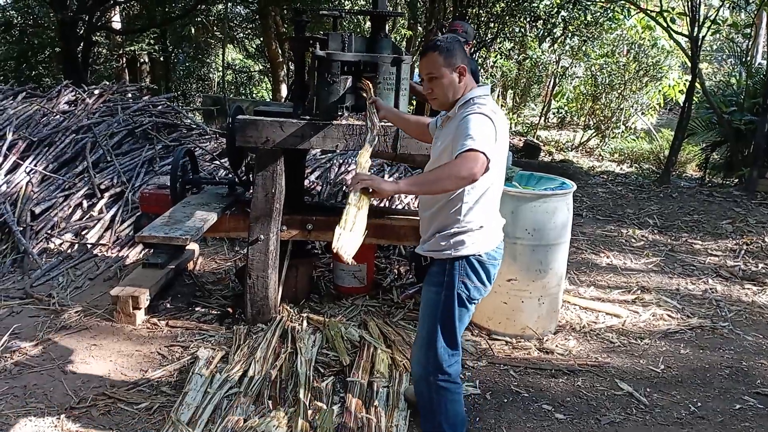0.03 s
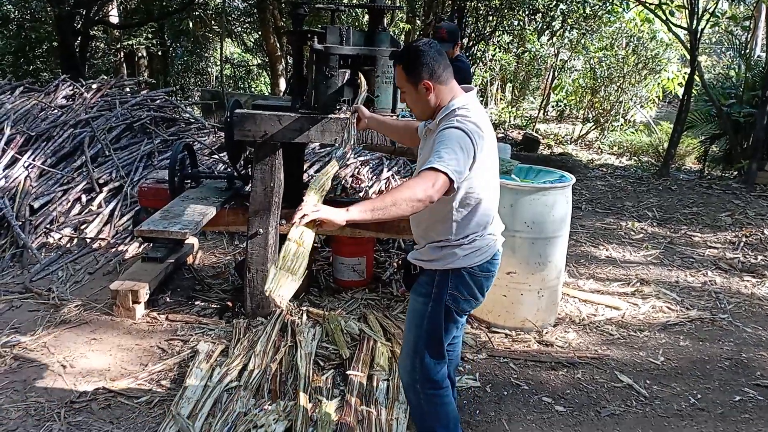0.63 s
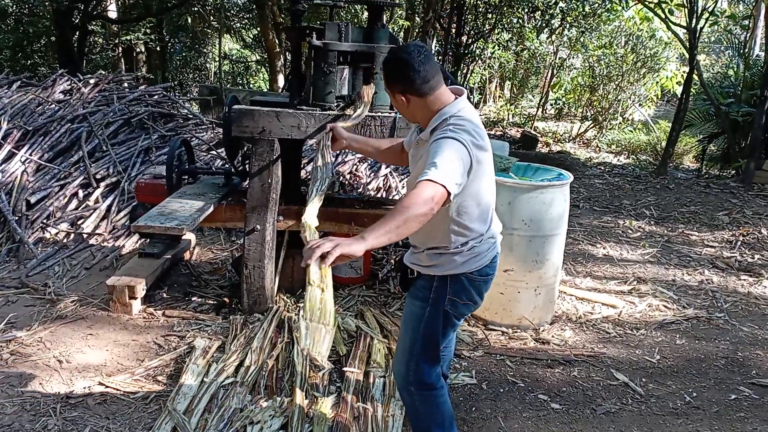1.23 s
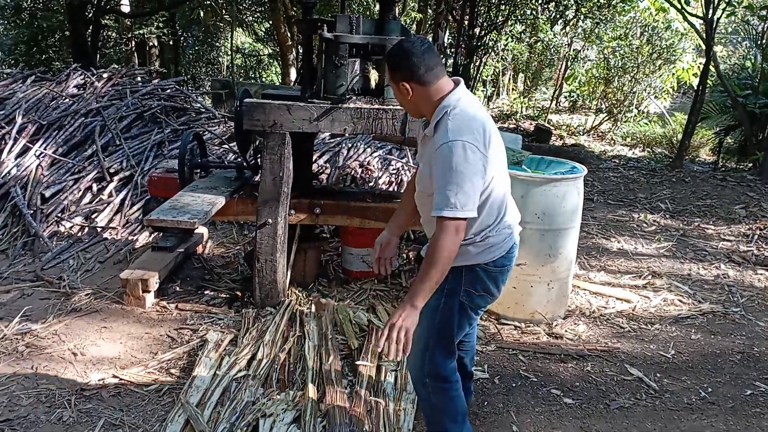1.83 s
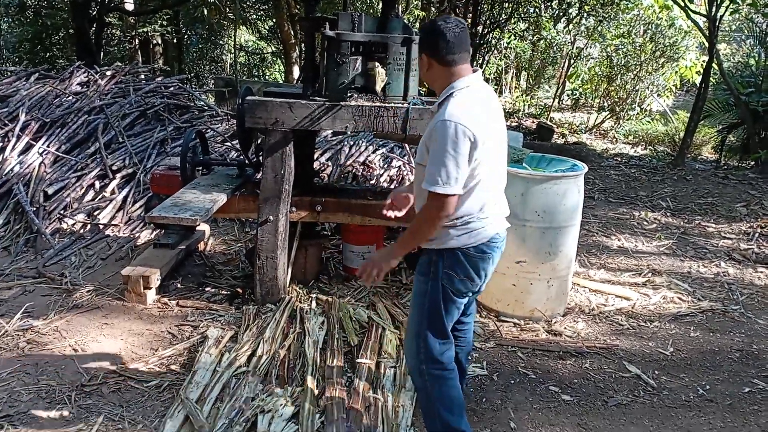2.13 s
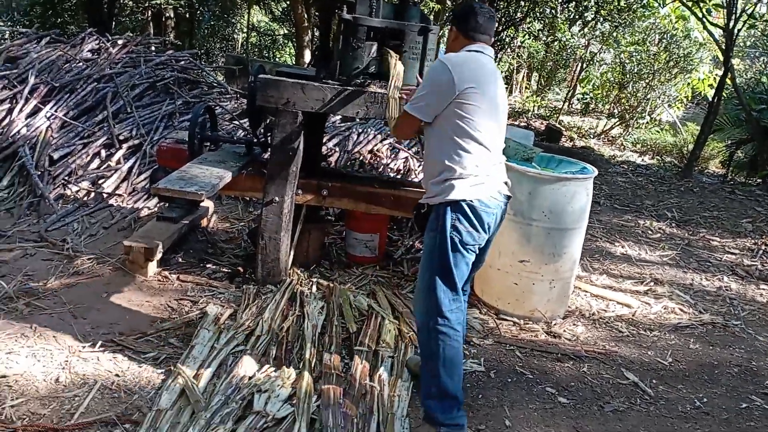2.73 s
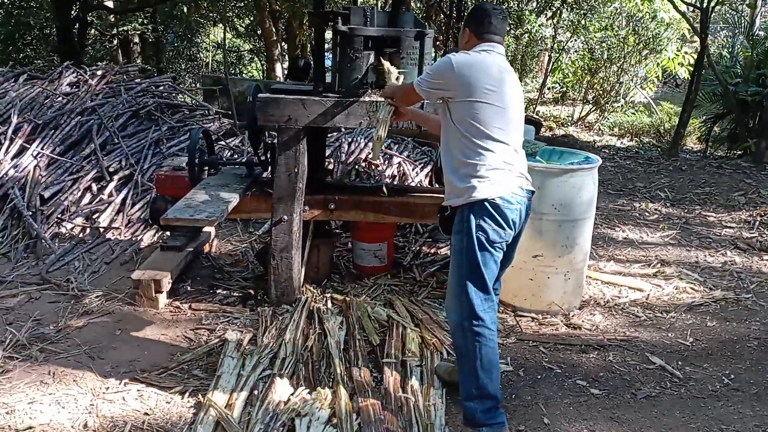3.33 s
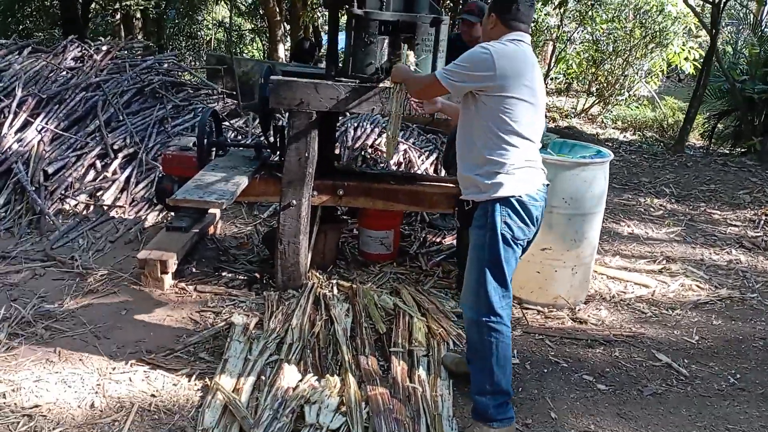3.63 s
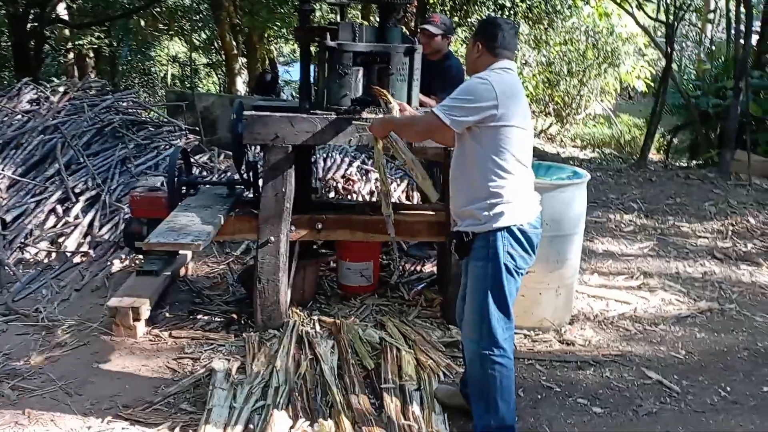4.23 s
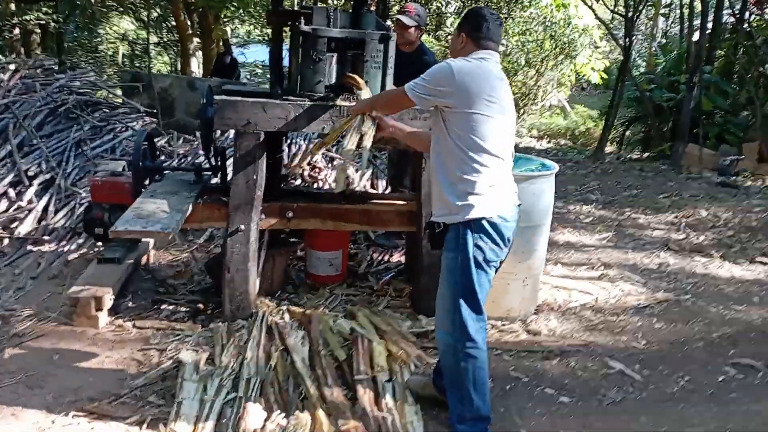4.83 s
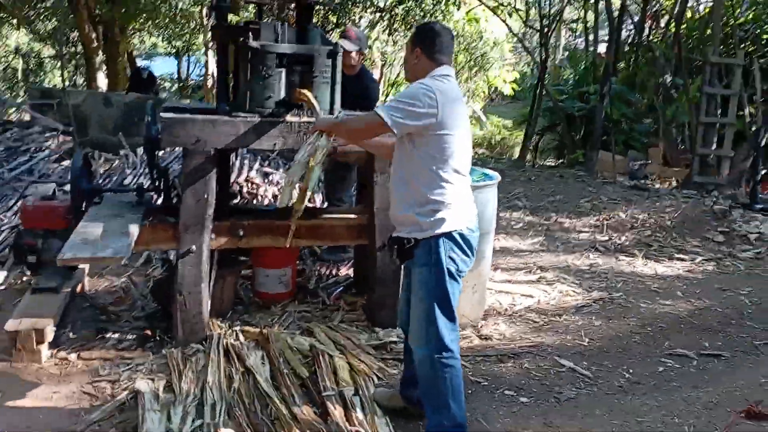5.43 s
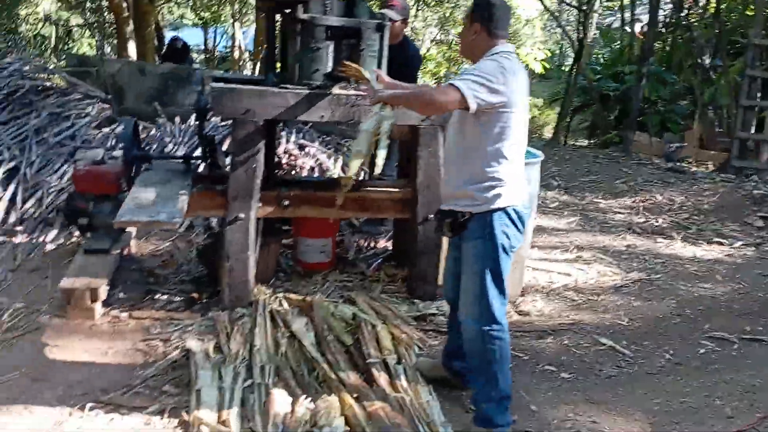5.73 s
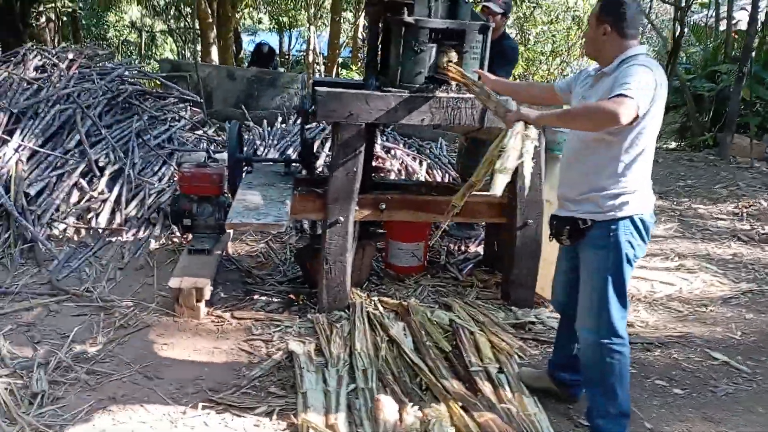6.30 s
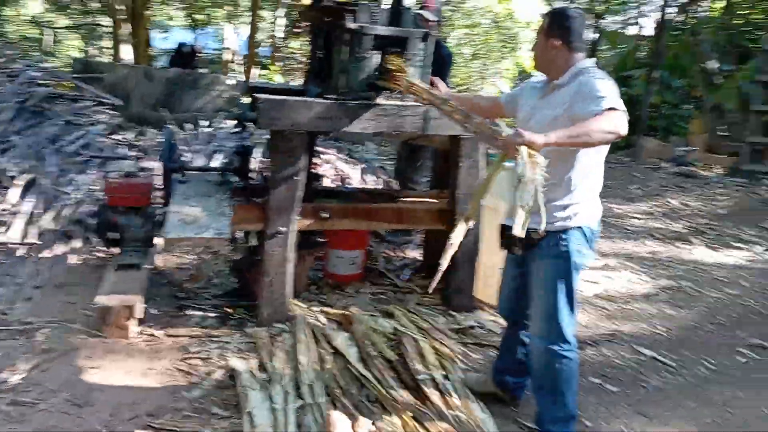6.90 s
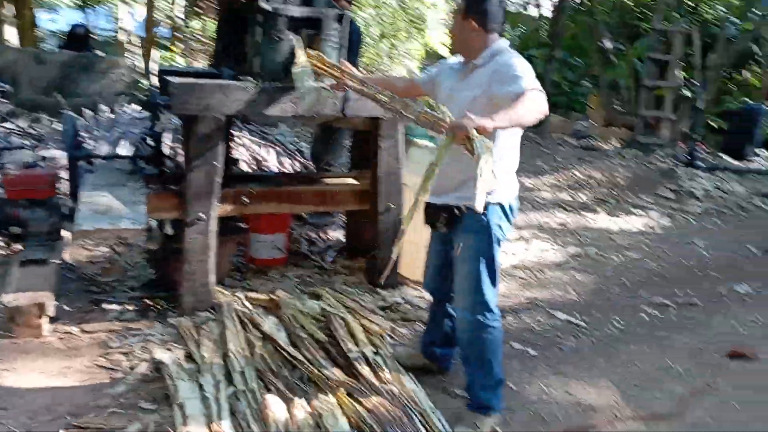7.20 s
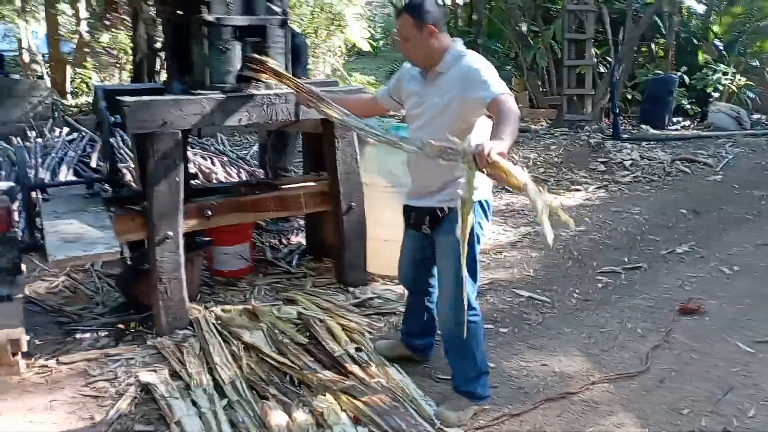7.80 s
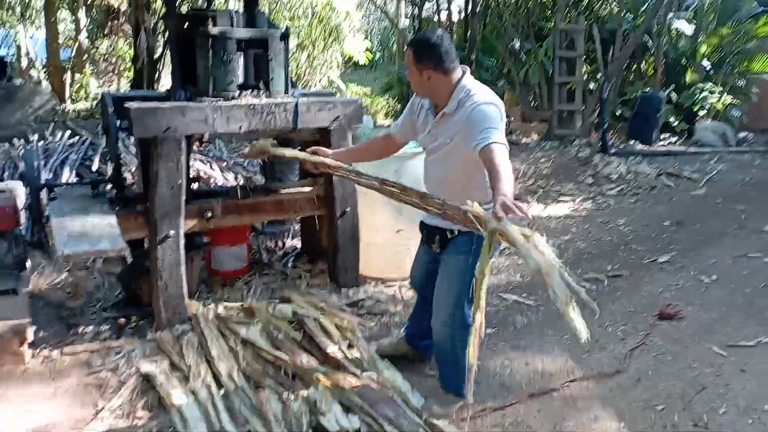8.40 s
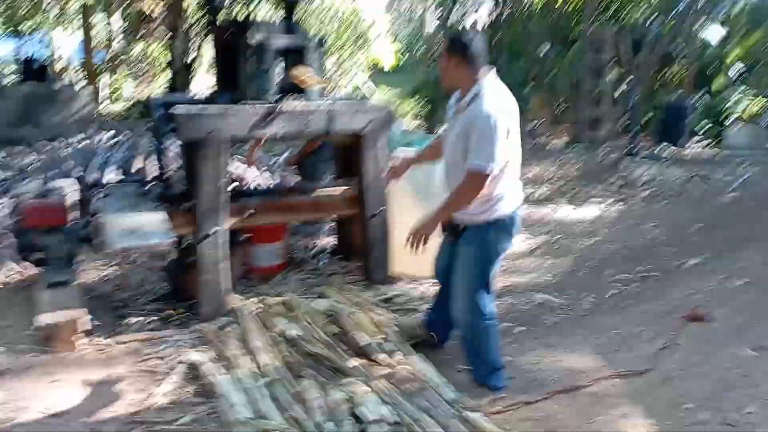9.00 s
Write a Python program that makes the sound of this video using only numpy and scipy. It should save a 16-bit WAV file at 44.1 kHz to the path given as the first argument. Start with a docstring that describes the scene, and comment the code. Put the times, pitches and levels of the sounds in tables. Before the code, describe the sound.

A single-cylinder engine runs a clattering roller mill; cane snaps three times early, and later the engine labours and picks up again.

```python
"""A single-cylinder four-stroke engine belt-drives a roller cane mill in an open yard.
Each firing rings the muffler; as cane loads the rollers the engine sags and its note hardens.
The block clatters, the frame hums, the drive hisses and whines, and three stalks snap early on.
The microphone is a hand-held stereo phone a few metres off, over hard ground,
carried from the front of the mill part of the way round to its side."""
import sys
import numpy as np
from scipy import signal
from scipy.fft import rfft, irfft, next_fast_len
from scipy.io import wavfile
from scipy.ndimage import uniform_filter1d, map_coordinates

SR = 44100
rng = np.random.default_rng(int(sys.argv[2]) if len(sys.argv) > 2 else 0)


def store_wav(level_fs):
    """Save 16-bit WAV to argv[1]."""
    pcm = np.round(np.clip(np.atleast_2d(level_fs), -1, 1) * 32767)
    wavfile.write(sys.argv[1], SR, pcm.T.astype(np.int16))


N = 403515
TIME = np.arange(N) / SR
BINS = np.fft.rfftfreq(next_fast_len(N), 1 / SR)

# engine speed: t/s, firing rate/Hz
FIRING_RATE = [(0.0, 38.26), (1.06, 38.66), (1.4, 39.59), (1.74, 40.2), (2.52, 40.66), (3.22, 40.66),
               (3.67, 41.22), (4.8, 41.2), (5.29, 40.41), (5.46, 40.64), (5.98, 40.8), (6.27, 39.32),
               (7.36, 37.18), (7.74, 37.54), (8.02, 38.91), (8.58, 40.64), (9.15, 41.17)]
# work at the rollers: t/s, load (0 running free, 1 biting the cane, 2 crushing, 3 labouring)
ROLLER_LOAD = [(0, 0.47), (1.15, 0.41), (1.7, 1.02), (3, 1.03), (4.6, 2.06), (5.2, 2.19), (5.8, 2.6),
               (6.5, 2.51), (7, 2.94), (7.85, 2.92), (8.2, 2.54), (9.15, 2.36)]
# microphone position: t/s, view (0 in front of the mill, 1 beside it), lag of the ground bounce/ms
MIC_PATH = [(0, 0.097, 0.75), (5.8, 0.036, 0.67), (7.7, 0.5, 0.766), (8.2, .53, 1.09), (9.15, .62, 1.28)]
# microphone aim: t/s, bearing of the mill to the right/degrees
MIC_BEARING = [(0, 24), (4.5, 24.3), (5.2, 32), (5.8, 33.4), (6.25, 23.4), (6.75, 24.6), (7.7, 41.3),
               (9.15, 37.5)]
# exhaust note at each of the four loads: multiple of the firing rate, relative level/dB
NOTE_FREE = [(1, -43), (2, -15), (3, -13.5), (4, -13), (5, -14), (6, 2.5), (7, -10.5), (8, -1), (9, -3),
             (10, 4.5), (11, -11), (12, -8), (13, -7), (14, -31), (15, -9), (16, -11), (17, -39)]
NOTE_BITING = [(1, -42), (2, -11), (3, -19.5), (4, -7.5), (5, -3), (6, 3), (7, -9.5), (8, -2), (9, -1.5),
               (10, -18), (11, -8.5), (12, -7.5), (13, -21), (14, -19.5), (15, -26), (16, -40), (17, -32)]
NOTE_CRUSHING = [(1, -43), (2, -7), (3, -26), (4, -7), (5, 1.5), (6, 2), (7, -10.5), (8, -5.5), (9, -0.5),
                 (10, -11.5), (11, -15), (12, -15.5), (13, -13), (14, -19.5), (15, -21.5), (16, -27),
                 (17, -26.5)]
NOTE_LABOURING = [(1, -33.5), (2, -33), (3, -28.5), (4, -11), (5, -3.5), (6, -1), (7, -10.5), (8, 0.5),
                  (9, 0), (10, -0.5), (11, -4.5), (12, -4.5), (13, -5.5), (14, -15), (15, -16.5), (16, -19),
                  (17, -25.5)]
# band the muffler's chambers hold back, a row per load: multiple of the firing rate, lag scale/rad
CHAMBER_LAG = [(6.5, 3.6), (10, 4), (10, 3.6), (10, 1.6)]
# rush of exhaust gas: f/Hz, relative level/dB
GAS_SPECTRUM = [(20, -46), (45, -30), (90, -13), (140, -13), (200, -6.5), (260, 2), (330, -3), (430, -0.5),
                (540, -9), (680, -28), (1200, -62)]
# block clatter and drive hiss, from the front and from the side: f/Hz, relative level/dB
CLATTER_FRONT_SPECTRUM = [(360, -19.5), (620, -7), (731, -9.5), (828, -2.5), (953, -2.5), (1040, -2),
                          (1180, -2), (1470, -2.5), (1560, -1), (1660, -7), (1810, -12.5), (1940, -8.5),
                          (2400, -9), (3120, -88), (5280, -120)]
CLATTER_SIDE_SPECTRUM = [(330, -60), (560, -18), (606, -7.5), (710, 2.5), (884, -5), (1040, -3), (1090, -8),
                         (1220, -9.5), (1470, -33), (1680, -5.5), (2400, -20), (3120, -48), (5280, -120)]
HISS_FRONT_SPECTRUM = [(1350, -33), (2300, -3.5), (2550, -1.5), (3300, -0.5), (4020, -2.5), (4460, -1),
                       (4880, -2.5), (6340, -4.5), (7500, -15.5), (9750, -4), (16500, -120)]
HISS_SIDE_SPECTRUM = [(1350, -12), (2300, -2.5), (3470, -1.5), (4420, -7), (4950, -4), (5520, -8.5),
                      (6030, -9), (6150, -7), (7500, -19), (9750, -48), (16500, -120)]
# gritty top end: f/Hz, relative level/dB
SIZZLE_SPECTRUM = [(4240, -24.5), (7200, -3.5), (9880, 0.5), (13900, -13.5), (15700, -18)]
# gear whines: multiple of the firing rate, level at load 2/dB, phase wobble/rad
GEAR_TONES = [(15, -55, .3), (20, -54.5, 0.5), (22, -53, .5), (25, -49.5, 0.9), (35, -47.5, 0.98),
              (37, -52, 1), (48, -51.5, .3), (54, -58, .4)]
# stalks snapping: t/s, level/dB, ring f/Hz
CANE_SNAPS = [(.749, -25, 7000), (1.169, -21, 4600), (1.307, -14, 2250)]
# sound scattered by the yard: f/Hz, share of the power (0-1)
YARD_SCATTER = [(60, 0.1), (300, 0.01), (700, 0.33), (1400, 0.28), (2500, 0.38), (5000, 0.63), (7000, 0.53),
                (10000, 0.83)]
# stereo balance at the microphone: f/Hz, left minus right/dB
MIC_BALANCE = [(60, 2), (150, 0.5), (220, 0.1), (320, 0.5), (480, 4.5), (700, -3.5), (1400, 3),
               (2200, -0.5), (4000, -4), (6500, -3.6), (8200, -2.5), (10000, -9), (15000, -10.5)]
# layer levels: base level/dB, dB per step of load, dB per Hz above NOMINAL_HZ, gain at the side/dB
EXHAUST_LEVEL = (-21.5, 1.5, 0.13, -4)
CLATTER_LEVEL = (-35, 0.62, 0.4, 1.6)
HISS_LEVEL = (-34.5, 0.57, 0.5, 1)
SIZZLE_LEVEL = (-36, 1.96, 0.5, 0.5)

NOMINAL_HZ = 40.4
GAS_DB = -12.5  # relative to the exhaust level
RATTLE_DB, BLOCK_DB = 2, -5  # relative to the clatter level


def undb(db):
    """Decibels to gain."""
    return 10 ** (np.asarray(db) / 20)


def unit(x):
    """Scale to rms 1."""
    return x / np.sqrt(np.mean(x ** 2))


def curves(table):
    """Each column of a table as a signal in time."""
    times, *columns = np.transpose(table)
    return [np.interp(TIME, times, column) for column in columns]


def at_bins(table):
    """A table over frequency, read at every bin."""
    hz, value = np.transpose(table)
    return np.interp(np.log(BINS + 1), np.log(hz), value)


def shape(x, gain):
    """Filter by a gain for every bin."""
    size = next_fast_len(N)
    return irfft(rfft(x, size) * gain, size)[..., :N]


def drift(rate_hz):
    """Smooth random wander, rms 1."""
    hold = int(SR / rate_hz)
    steps = np.repeat(rng.standard_normal(N // hold + 1), hold)
    return unit(uniform_filter1d(uniform_filter1d(steps, hold), hold)[:N])


def delay(x, ms):
    """Delay a signal by a moving time."""
    return map_coordinates(x, [np.arange(N) - ms * SR / 1000], order=3, mode="mirror")


def level(law, firing_hz, load, view):
    """A layer's level in dB: it grows with load and speed, and changes with microphone position."""
    db, per_load_db, per_hz_db, side_db = law
    return db + per_load_db * load + per_hz_db * (firing_hz - NOMINAL_HZ) + side_db * view


def metal_ripple(ripple_db=2.5, spacing_hz=110):
    """Close modes of the metalwork make the spectrum uneven, most of all near 4 kHz (dB per bin)."""
    depth = np.exp(-np.log((BINS + 1) / 4000) ** 2)
    return ripple_db * depth * np.interp(BINS / spacing_hz, np.arange(512), rng.standard_normal(512))


def yard_paths(source, envelope, spectrum):
    """Colour a source and send it across the yard; rows: direct, scattered left, scattered right."""
    colour = undb(at_bins(spectrum) + metal_ripple())
    share = np.clip(at_bins(YARD_SCATTER), 0, 1)
    direct = shape(unit(source), colour * np.sqrt(1 - share))
    scattered = shape(unit(envelope) * rng.standard_normal((2, N)), colour * np.sqrt(share))
    return np.vstack([direct, scattered]) / np.std(direct + scattered.mean(axis=0))


def muffler(note, chamber, width=0.61, size=128):
    """Log gain and phase at each harmonic: a sharp pulse rings out, drawn longer by a chamber's lag."""
    orders, db = np.transpose(note)
    harmonic = np.arange(size // 2 + 1)
    cepstrum = irfft(np.log(undb(np.interp(harmonic, np.round(orders), db))))
    cepstrum[1:size // 2] *= 2  # minimum phase
    centre, lag = chamber
    return rfft(cepstrum[:size // 2], size) - 1j * lag * np.arctan((harmonic - centre) / width)


def exhaust(cycle, load, uneven_db=-0.03, jitter_cycles=0.0016, harmonics=17):
    """One pulse a cycle rings the muffler, harder under load; no two firings are quite alike."""
    notes = (NOTE_FREE, NOTE_BITING, NOTE_CRUSHING, NOTE_LABOURING)
    responses = np.array([muffler(note, chamber) for note, chamber in zip(notes, CHAMBER_LAG)])
    firings = np.arange(int(cycle[-1]) + 2)
    timing, strength = rng.standard_normal((len(firings), 2)).T
    angle = 2 * np.pi * (cycle + jitter_cycles * np.interp(cycle, firings, timing))
    tone = 0
    for k in np.setdiff1d(np.arange(1, harmonics + 1), 2):  # the crank rate comes from the frame
        response = np.interp(load, np.arange(len(notes)), responses[:, k])
        tone = tone + np.exp(response.real) * np.cos(k * angle + response.imag)
    return unit(tone) * undb(uneven_db * np.interp(cycle, firings, strength))


def gas_rush(cycle, puff=1.1, decay_cycles=0.59):
    """Turbulent gas rushes out after each firing."""
    rush = 1 + puff * np.exp(-(cycle % 1) / decay_cycles)
    return yard_paths(rush * rng.standard_normal(N), rush, GAS_SPECTRUM)


def knocks(cycle, swell_db, valve_db):
    """Mechanical noise swells once a crank turn and briefly jumps or dips when a valve seats."""
    turn = 2 * cycle % 1
    swell = np.cos(2 * np.pi * (turn + 0.12))
    valve = np.exp(-((turn - .85) / .04) ** 2)
    return undb(swell_db * swell + valve_db * valve)


def rattle(cycle, repeat, size=1024):
    """Dense small impacts; the share `repeat` returns at the same crank angle in every cycle."""
    pattern = np.interp(cycle % 1 * size, np.arange(size), rng.standard_normal(size))
    return np.sqrt(repeat) * pattern + np.sqrt(1 - repeat) * rng.standard_normal(N)


def metalwork(cycle, view, envelope, front, side, repeat):
    """Rattle rings the metal; its colour changes as the microphone moves round the mill."""
    impacts = envelope * rattle(cycle, repeat)
    blend = (1 - view) * yard_paths(impacts, envelope, front) + view * yard_paths(impacts, envelope, side)
    blend[1:] /= np.hypot(1 - view, view)  # scattered sound adds in power
    return blend


def drive_hiss(cycle, view):
    """The drive hisses, with a light tick on every crank turn."""
    ticking = knocks(cycle, swell_db=0.5, valve_db=1.0) * grains(1.05) * undb(0.4 * drift(20))
    return metalwork(cycle, view, ticking, HISS_FRONT_SPECTRUM, HISS_SIDE_SPECTRUM, repeat=0.1)


def grains(depth_db, size=24):
    """Gritty envelope: about every half millisecond has its own strength."""
    return undb(depth_db * np.repeat(rng.standard_normal(N // size + 1), size)[:N])


def sizzle(cycle):
    """Gritty treble noise pulses with the crank."""
    grit = knocks(cycle, swell_db=0.9, valve_db=-1.2) * grains(2.0) * undb(0.56 * drift(30))
    return yard_paths(grit * rng.standard_normal(N), grit, SIZZLE_SPECTRUM)


def block_ring(cycle, beat, mode_hz=1058, width_hz=55):
    """The knocks of every turn keep the engine block's strongest mode ringing."""
    mode = signal.iirpeak(mode_hz, mode_hz / width_hz, fs=SR)
    return unit(signal.lfilter(*mode, beat * rattle(cycle, repeat=0.55)))


def gear_whine(cycle, load, waver_db=2.0, per_load_db=3.0, ring_hz=6330, ring_db=-48):
    """Gear tones locked to the crank, louder as the teeth are loaded, and one thin metallic ring."""
    gears = 0
    for order, db, wobble in GEAR_TONES:
        gain = undb(db + waver_db * drift(4.4))
        gears = gears + gain * np.cos(2 * np.pi * order * cycle + wobble * drift(22))
    ring = undb(ring_db + 2.4 * drift(2.2)) * np.cos(2 * np.pi * ring_hz * TIME + 1.2 * drift(80))
    return undb(per_load_db * (load - 2.0)) * gears + ring


def frame_hum(cycle, firing_hz, view, mode_hz=81.8, width_hz=2.86, resonance_db=-37, side_db=2.5):
    """The unbalanced crank shakes the frame once a turn; the hum fades as it slows below resonance."""
    detuning = (2 * firing_hz - mode_hz) / (width_hz / 2)
    gain = undb(resonance_db + side_db * view) / np.hypot(1, detuning)
    return gain * unit(np.sin(4 * np.pi * cycle))


def cane_snaps(decay_s=0.0021, crack=0.46):
    """Fibres snap with a dry crack, each ringing its own piece of stalk."""
    snaps = 0
    for start, db, hz in CANE_SNAPS:
        age = np.maximum(TIME - start, 0)
        envelope = undb(db) * (age > 0) * np.exp(-age / decay_s)
        splinters = unit(signal.lfilter(*signal.iirpeak(hz, 1, fs=SR), rng.standard_normal(N)))
        snaps = snaps + envelope * (np.sin(2 * np.pi * hz * age) + crack * splinters)
    return snaps


def microphone(direct, scattered, port_spacing_ms=0.4):
    """Direct sound reaches the right port first; the stereo balance varies with frequency."""
    bearing, = curves(MIC_BEARING)
    left = delay(direct, port_spacing_ms * np.sin(np.radians(bearing)))
    ports = np.array([left, direct]) + scattered
    pan = undb(at_bins(MIC_BALANCE) / 2)
    return shape(ports, np.array([pan, 1 / pan]) * 2 / (pan + 1 / pan))


def scene():
    """The mill from a few metres off, its machine noise paced by the engine's cycle."""
    firing_hz, = curves(FIRING_RATE)
    load, = curves(ROLLER_LOAD)
    view, bounce_ms = curves(MIC_PATH)
    laws = (EXHAUST_LEVEL, CLATTER_LEVEL, HISS_LEVEL, SIZZLE_LEVEL)
    exhaust_db, clatter_db, hiss_db, sizzle_db = (level(law, firing_hz, load, view) for law in laws)
    cycle = np.cumsum(firing_hz) / SR  # one firing, two crank turns per cycle
    paths = undb(exhaust_db + GAS_DB) * gas_rush(cycle)
    beat = knocks(cycle, swell_db=1.0, valve_db=-1.0) * undb(0.76 * drift(25))
    clatter = metalwork(cycle, view, beat, CLATTER_FRONT_SPECTRUM, CLATTER_SIDE_SPECTRUM, repeat=0.45)
    paths += undb(clatter_db + RATTLE_DB) * clatter
    paths += undb(hiss_db) * drive_hiss(cycle, view)
    paths += undb(sizzle_db) * sizzle(cycle)
    direct, scattered = paths[0], paths[1:]
    direct += undb(clatter_db + BLOCK_DB) * block_ring(cycle, beat)
    direct += gear_whine(cycle, load) + cane_snaps()
    direct += 0.21 * delay(direct, bounce_ms)  # bounce off the hard ground
    direct += undb(exhaust_db) * exhaust(cycle, load) + frame_hum(cycle, firing_hz, view)
    return microphone(direct, scattered)


def record(dry):
    """The phone cuts the top steeply above 15.85 kHz."""
    return signal.sosfilt(signal.ellip(12, .1, 90, 15850, fs=SR, output="sos"), dry)


dry = scene()
out = record(dry)
store_wav(out)
```